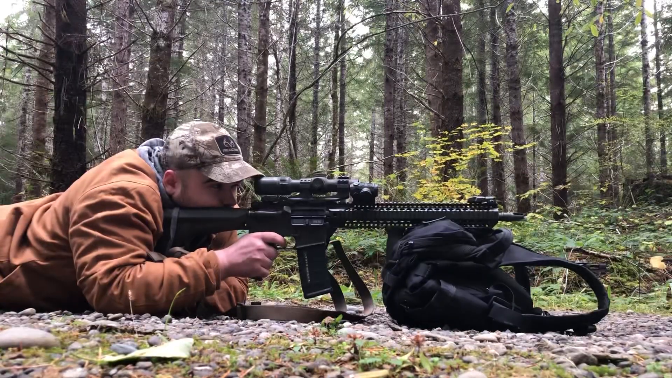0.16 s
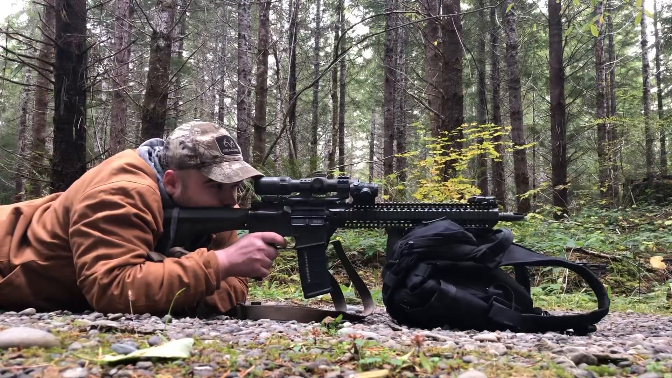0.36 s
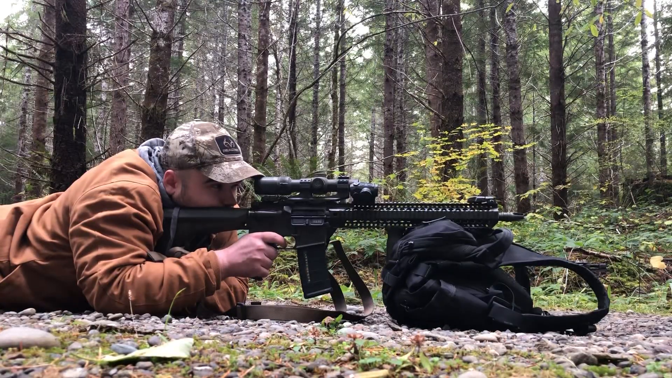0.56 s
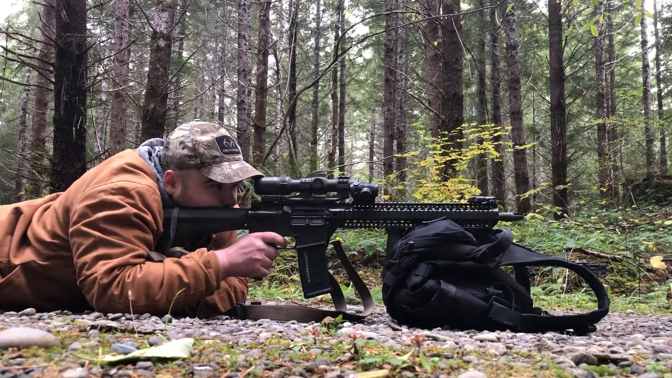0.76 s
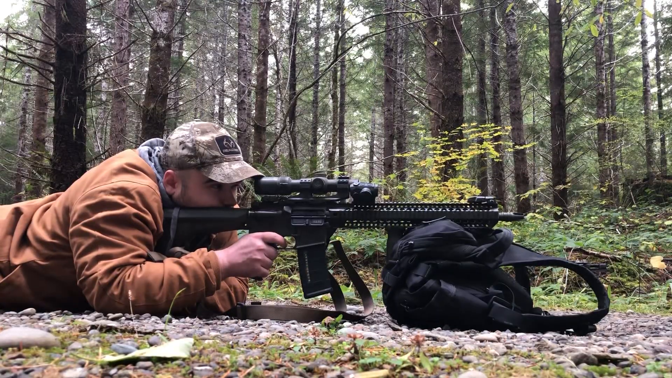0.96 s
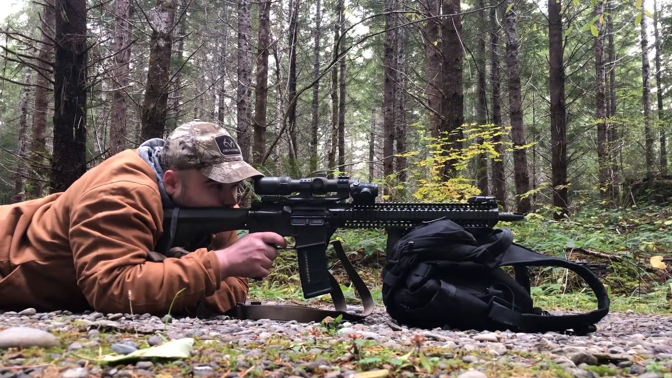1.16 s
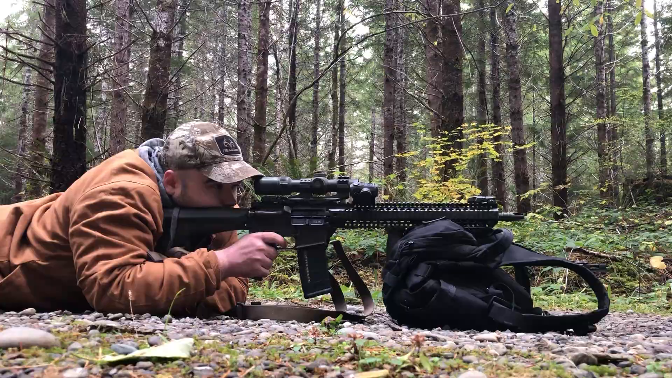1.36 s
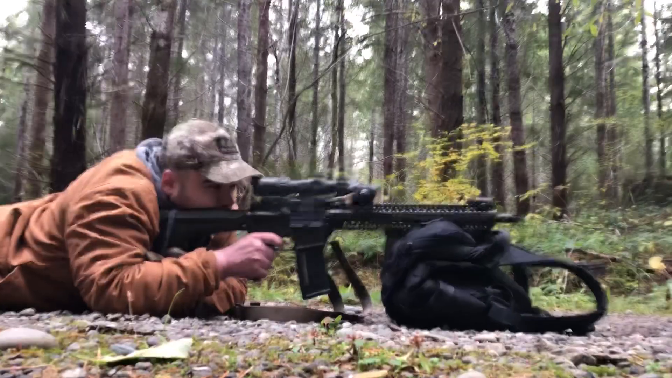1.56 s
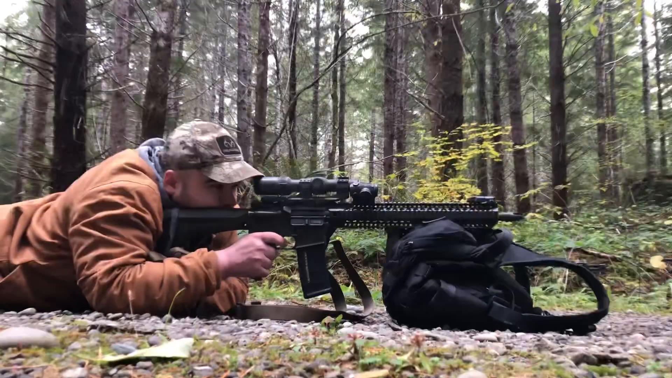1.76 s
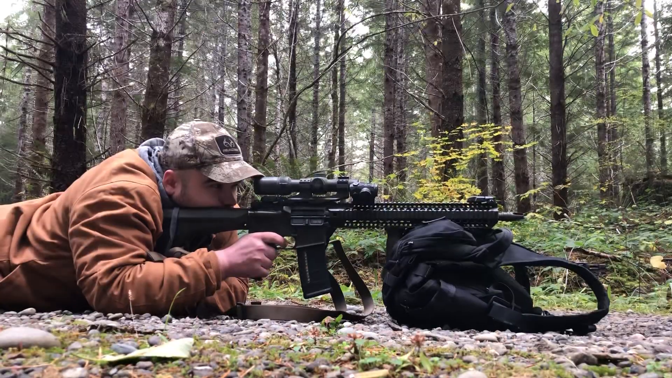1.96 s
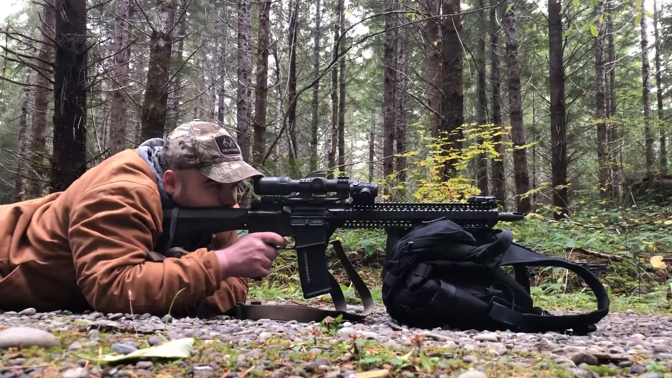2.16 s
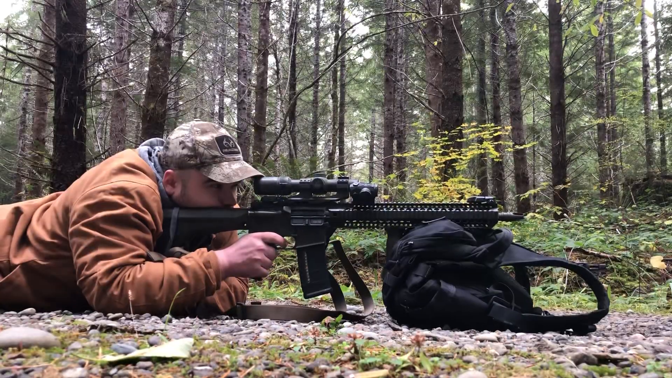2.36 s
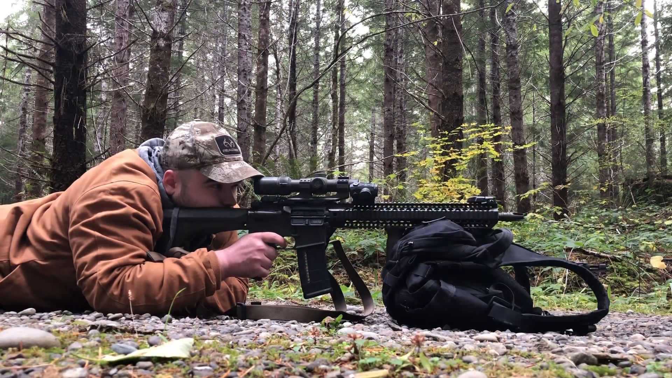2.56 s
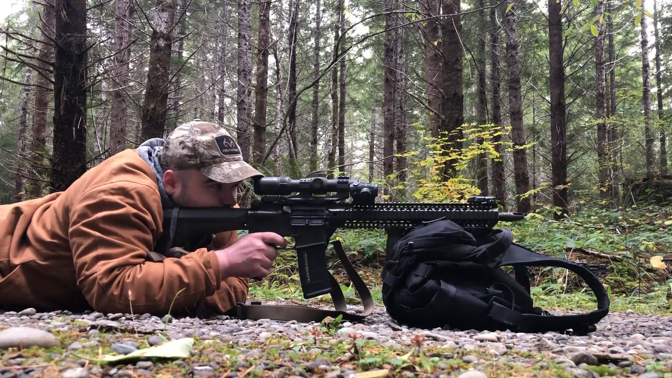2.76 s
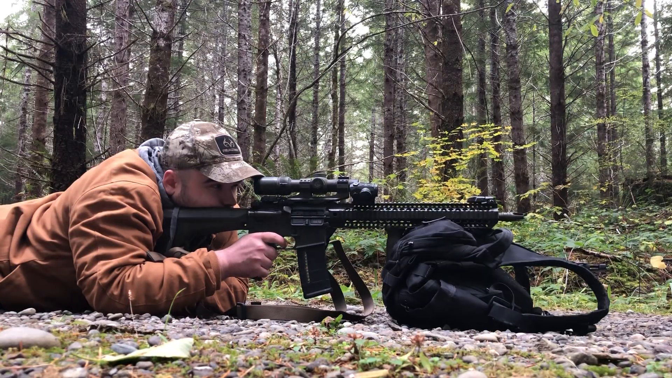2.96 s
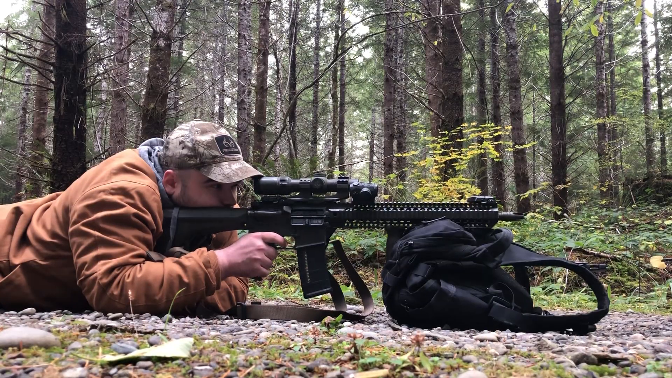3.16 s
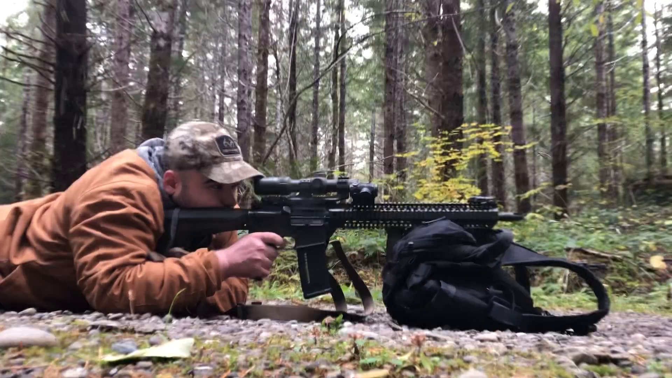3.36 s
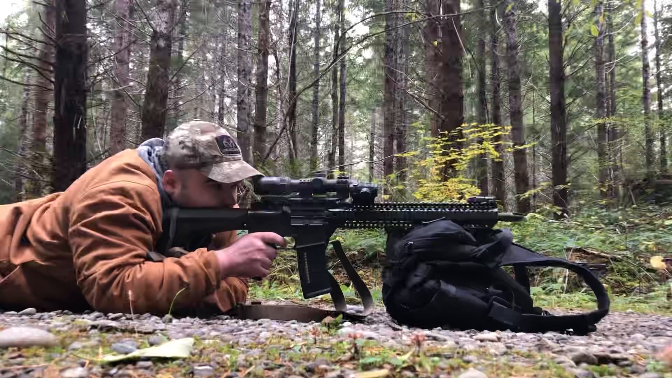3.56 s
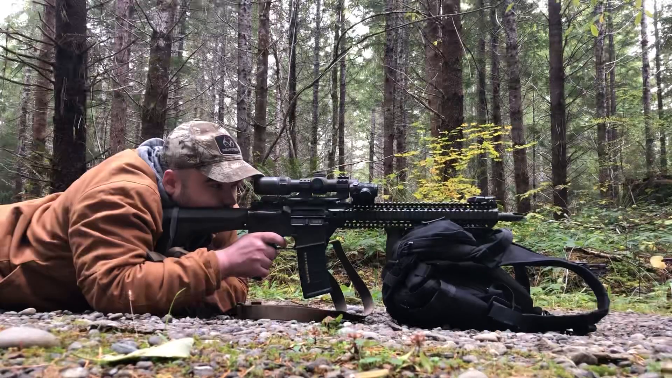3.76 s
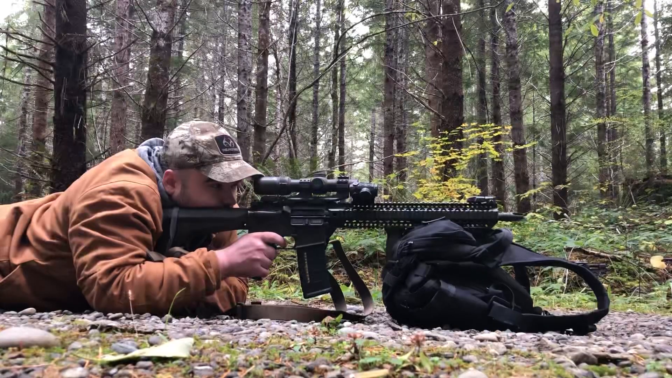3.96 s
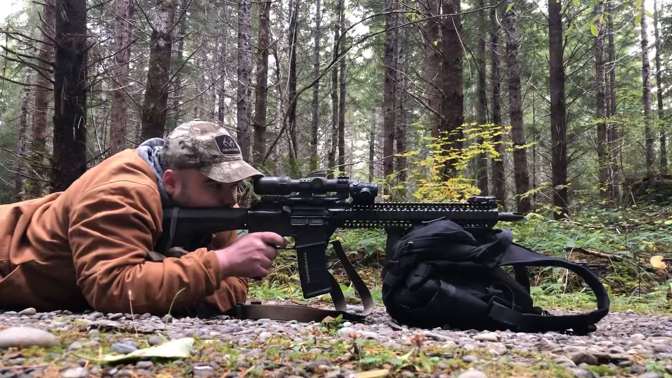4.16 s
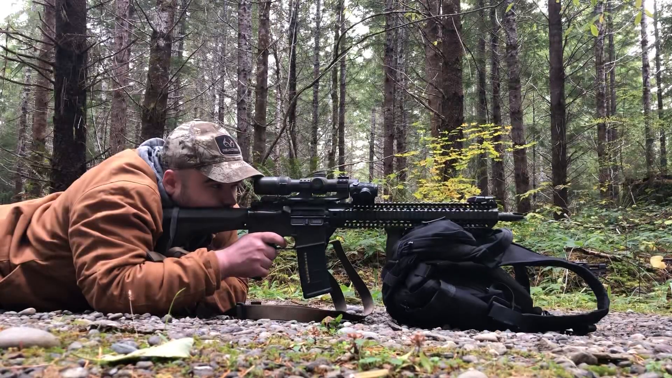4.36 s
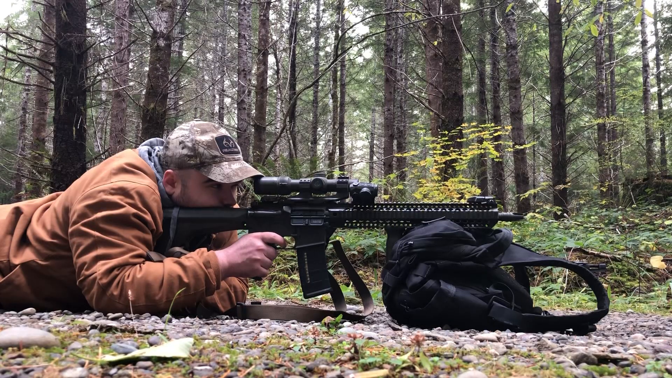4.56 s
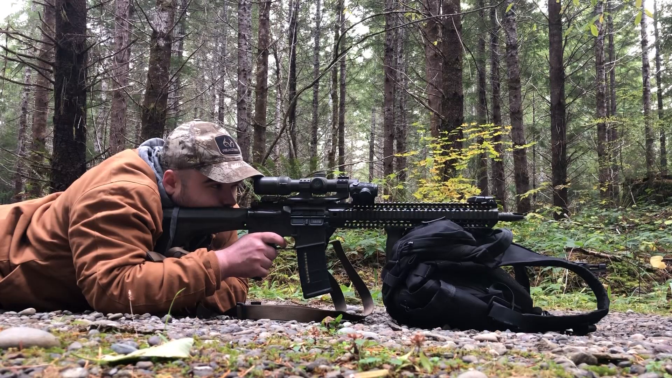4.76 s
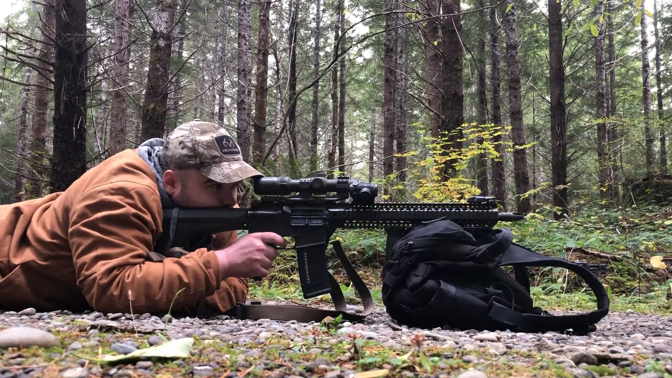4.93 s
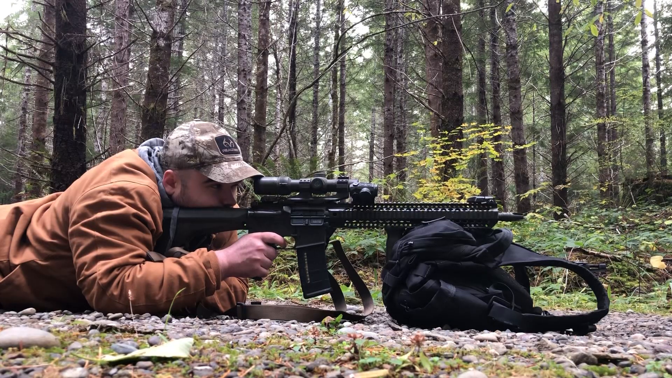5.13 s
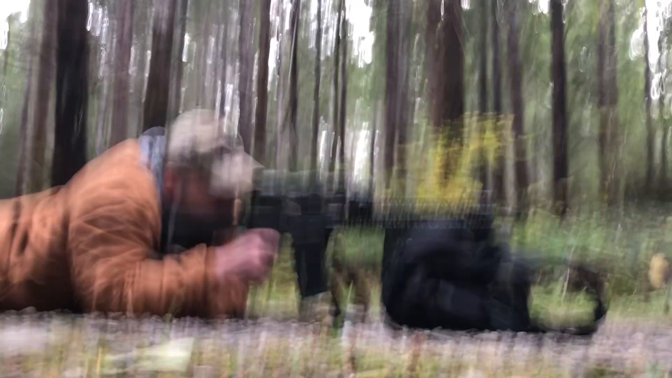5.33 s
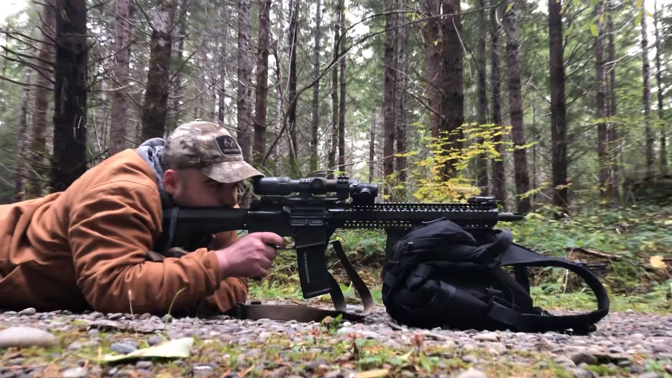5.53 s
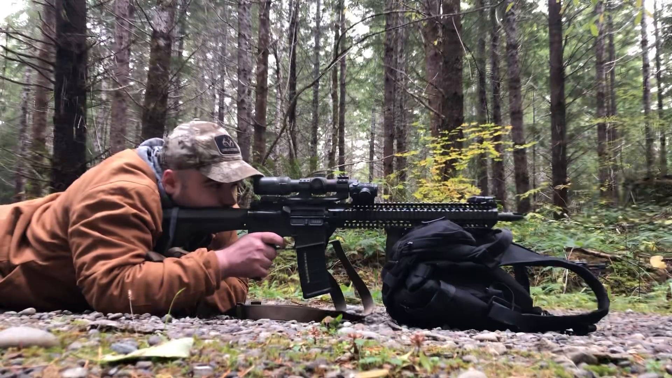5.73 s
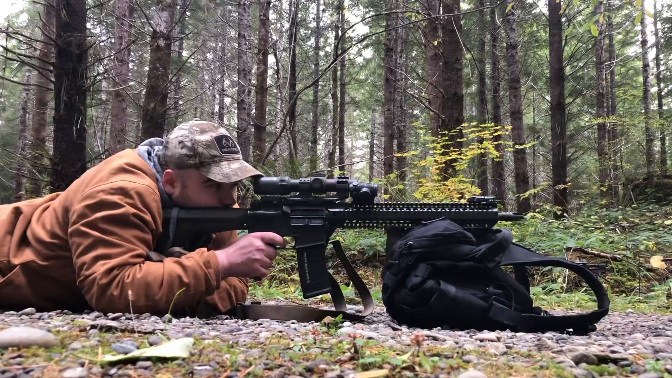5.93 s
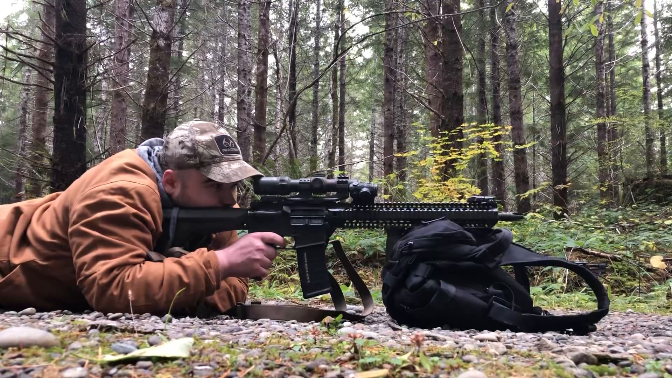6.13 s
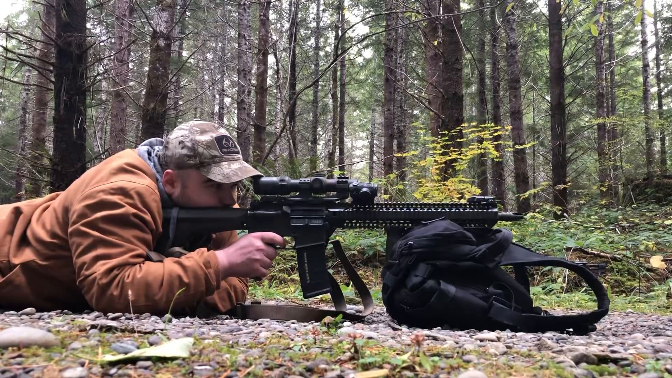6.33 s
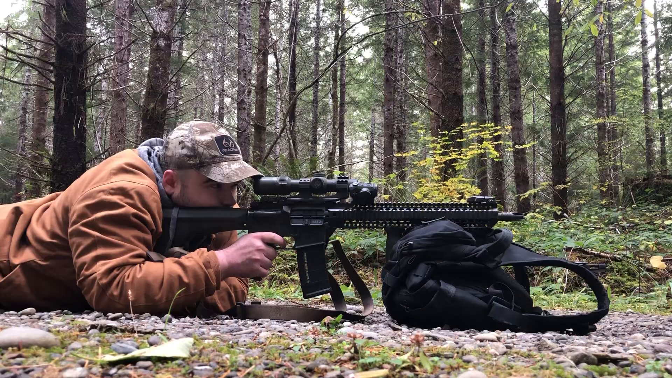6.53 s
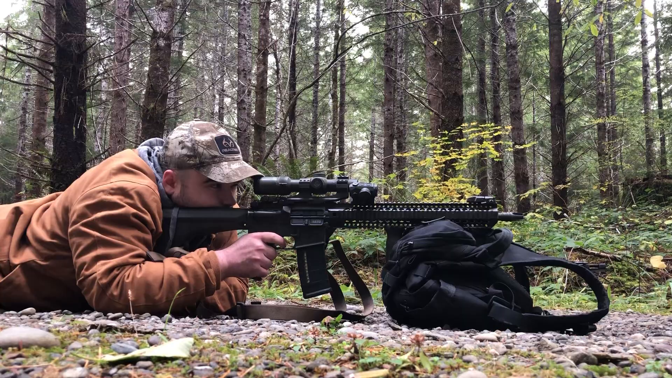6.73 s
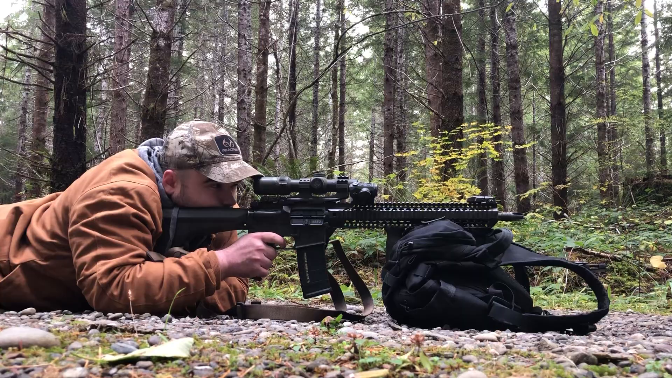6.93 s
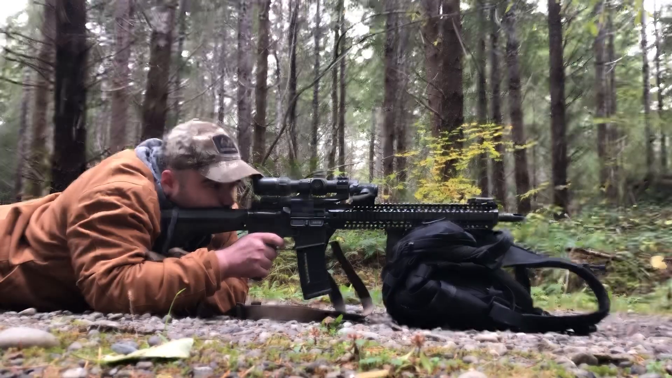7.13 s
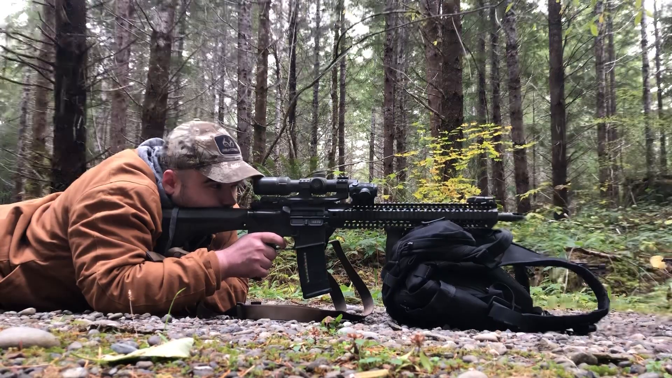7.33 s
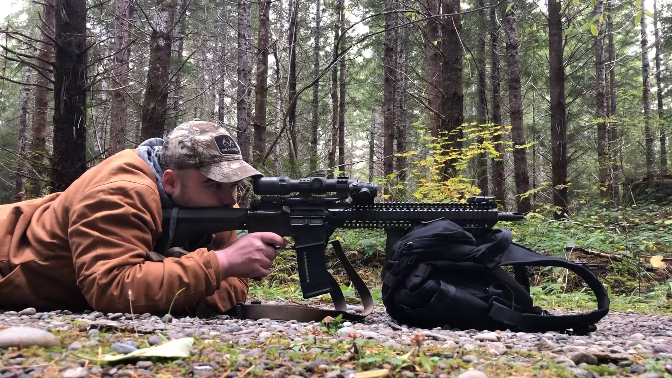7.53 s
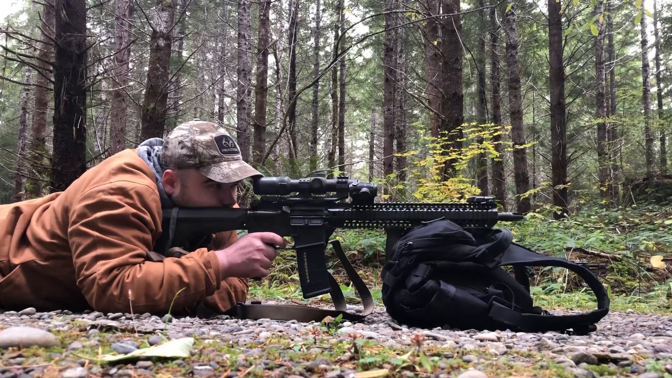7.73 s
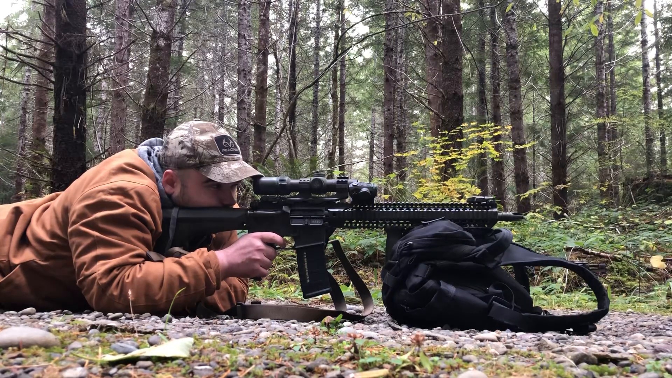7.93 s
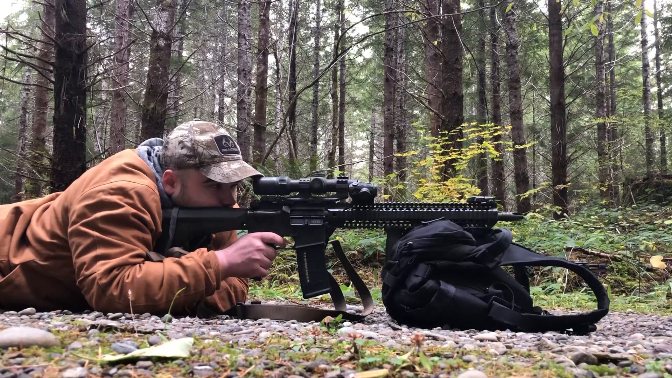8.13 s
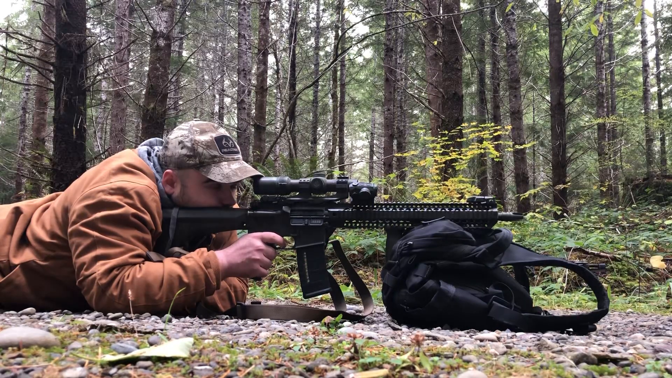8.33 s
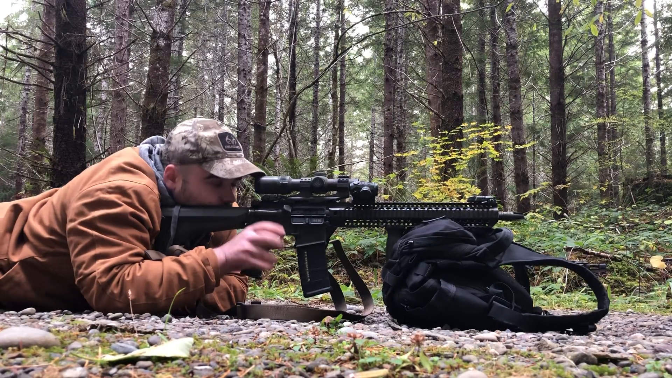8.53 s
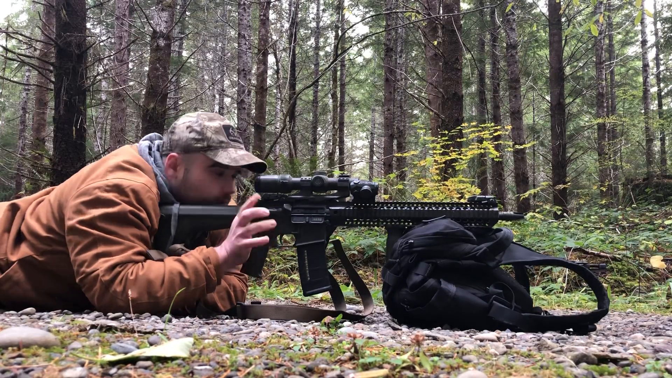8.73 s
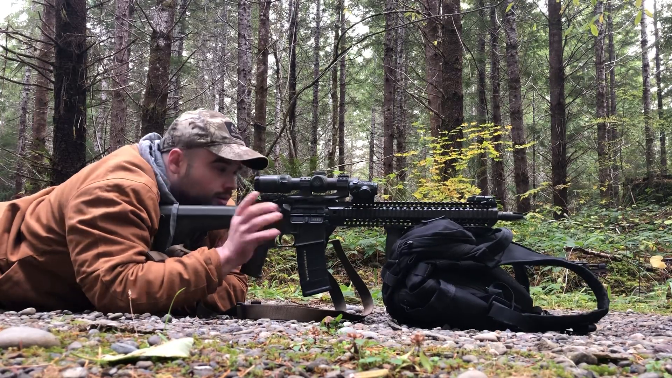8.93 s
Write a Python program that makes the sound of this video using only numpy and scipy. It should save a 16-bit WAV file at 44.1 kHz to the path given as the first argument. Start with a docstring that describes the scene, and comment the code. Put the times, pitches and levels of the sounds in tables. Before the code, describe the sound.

A rifle fires four single shots outdoors with long rolling echoes, small casing clinks and far-off hits on steel, then a click.

```python
"""Slow, close rifle shots in a hushed conifer forest. We open on the tail of a shot rolling away, and a
far steel target answers. Four more follow, one cued by a faint trigger click. Each time the action
rattles, the blast slaps back off ground and trunks and the bolt slams shut; as the echo rolls off through
the wood, the brass case tinkles on gravel, and a second after the bang the target answers again.
At the end the safety clicks on."""
import sys
import numpy as np
from scipy import signal
from scipy.fft import rfft, irfft, next_fast_len
from scipy.io import wavfile
from scipy.ndimage import uniform_filter1d

SR = 44100
rng = np.random.default_rng(int(sys.argv[2]) if len(sys.argv) > 2 else 0)


def dump(signal):
    """Clip the signal to [-1, 1] and save it as 16-bit WAV at the path in sys.argv[1]."""
    limited = np.clip(np.atleast_2d(signal).T, -1, 1)
    pcm = np.round(limited * 32767).astype(np.int16)
    wavfile.write(sys.argv[1], SR, pcm)


N = 396455
TAIL_SAMPLES = 2 ** 17

# EQ of the forest bed, the lever snap and the target's far echo: freq_hz, gain_db
HUSH_EQ = [(25, -49), (60, -36), (100, -21), (160, -5), (260, 0), (400, 0), (560, -5), (780, -11),
           (1050, -10), (1500, -15), (2300, -21), (3200, -41), (5000, -61), (15000, -64)]
LEVER_EQ = [(30, -48), (200, -20), (550, -5), (1000, -8), (1550, -1), (2300, -13), (3200, -6), (5000, -11),
            (7500, -16), (10000, -10), (12500, 0), (15000, -4), (16000, -18)]
FAR_ECHO_EQ = [(30, -45), (150, -18), (400, -3), (1000, 0), (2500, -3), (4000, -12), (6500, -25),
               (8500, -40), (12000, -60)]
# cues for the trigger, then the safety: start_s, level_db
LEVER_CUES = [(3.1525, -50), (8.8558, -20.5)]
# bullets at the target, each spot favouring one pitch: start_s, crack_db, ring_db, favoured_hz
HIT_CUES = [(.3915, -29, -53, 6200), (2.5695, -33, -63, 6400), (4.2788, -32, -56, 4900),
            (6.3843, -31, -55, 5000), (8.0757, -29, -53, 4900)]
# modes of the steel plate and of a brass case (retuned for each case): pitch_hz, level_db, t60_s
STEEL_MODES = [(3380, -2, .55), (4945, -7, .4), (5262, 0, .3), (5696, -8, .6), (6056, -9, .28),
               (6627, 0, .2), (7436, -15, .18), (7637, -12, .18)]
BRASS_MODES = [(10710, -15, .26), (10760, -15, .26), (14730, -17, .18), (15090, -7, .22), (15130, 0, .14)]
# falling cases: start_s, hop_s, landing_db, rebound_db, tick_db, other_end_s, last_loss_db, pitch_hz
CASE_CUES = [(1.8215, .171, -47, -47, -60, .076, 7, 10950), (3.573, .14, -41, -46, -46, .036, 16, 10790),
             (5.6795, .2343, -24, -44, -38, .079, 4, 10710), (7.337, .1075, -43, -53, -60, .153, 10, 10860)]
# EQ of the muzzle blast, its scatter in the clearing and its echo from the wood: freq_hz, gain_db
BLAST_EQ = [(25, -26), (90, -4), (400, -1), (550, -2), (700, -6), (900, 0), (1250, -4), (1700, 1),
            (2700, -4), (4000, -5), (6200, -8), (7500, -11), (11000, -11.5), (15500, -15.5)]
CLEARING_EQ = [(25, -24), (70, -4), (150, -2), (260, -4), (450, -4), (650, -4), (1000, -3), (1800, -3),
               (2400, -11), (4000, -13), (6300, -12), (10000, -18), (15500, -23)]
WOOD_EQ = [(25, -32), (70, -18), (130, -9), (200, -4), (350, -2), (600, -4), (800, -7), (1100, -8),
           (1700, -8), (2800, -13), (4500, -10), (6500, -15), (10000, -21), (15500, -29)]
# what the air absorbs: freq_hz, loss_db_per_s
AIR_LOSS = [(50, 15), (150, 10), (400, 1.5), (1000, .5), (2500, 2), (4500, 16), (7000, 31), (10000, 58),
            (15000, 105)]
# two near slaps, off the ground and then the nearest trunk: delay_s, level_db, pitch_hz
NEAR_SLAPS = [(.0128, -9, 420), (.0321, -6.5, 330)]
# resonances of the rifle as it fires and as the bolt closes: centre_hz, width_hz, level_db
ACTION_BANDS = [(290, 220, -3.5), (1780, 170, 0), (2200, 220, -3), (3000, 130, -8)]
BOLT_BANDS = [(600, 150, -6), (6300, 500, -2), (9300, 900, -3), (12000, 2000, 0)]
# shots, the first already rolling away as we open: start_s, bolt_delay_s, bolt_db
SHOT_CUES = [(-.68, .074, -22), (1.4972, .0705, -21), (3.216, .0745, -20), (5.3253, .074, -20.5),
             (7.0124, .072, -20)]


def amp(db):
    return 10 ** (np.asarray(db) / 20)


def unit_rms(x):
    return x / np.sqrt(np.mean(x ** 2) + 1e-20)


def curve_at(points, hz):
    freq_hz, value = np.transpose(points)
    return np.interp(np.log(hz + 1), np.log(freq_hz), value)


def add(mix, start_s, sound):
    start = round(start_s * SR)
    sound = sound[max(-start, 0):]
    part = mix[max(start, 0):][:len(sound)]
    part += sound[:len(part)]


def clock(size):
    return np.arange(size) / SR


def fade(t, t60, hold_s=0):
    """Holds full level, then falls 60 dB every t60 seconds."""
    return np.exp(-np.log(1000) * np.maximum(t - hold_s, 0) / t60)


def colour(x, eq):
    """Runs x through an EQ curve, at rms 1."""
    size = next_fast_len(len(x), True)
    gain = amp(curve_at(eq, np.fft.rfftfreq(size, 1 / SR)))
    return unit_rms(irfft(rfft(x, size) * gain, size)[:len(x)])


def burst(eq, envelope):
    """Enveloped noise through a minimum-phase EQ, so even the attack carries the colour."""
    hz = abs(np.fft.fftfreq(len(envelope), 1 / SR))
    log_gain = np.log(unit_rms(amp(curve_at(eq, hz))))
    causal = np.exp(np.conj(signal.hilbert(log_gain)))
    return np.fft.ifft(np.fft.fft(rng.standard_normal(len(envelope)) * envelope) * causal).real


def rattle(bands, size):
    """Noise in a few resonances, at rms 1."""
    hz = np.fft.rfftfreq(size, 1 / SR)
    gain = sum(amp(db) / np.sqrt(width) / (1 + (2 * (hz - f) / width) ** 2) for f, width, db in bands)
    return unit_rms(irfft(rfft(rng.standard_normal(size)) * gain, size))


def ring(modes, t):
    """Dying sines of struck metal."""
    return sum(amp(db) * fade(t, t60) * np.sin(2 * np.pi * (hz * t + rng.random()))
               for hz, db, t60 in modes)


def forest_hush(level_db=-50.5, waver_db=.5):
    """The bed: a low, steady rush of distant forest."""
    waver = unit_rms(uniform_filter1d(rng.standard_normal(N), size=6000))
    return amp(level_db) * colour(rng.standard_normal(N), HUSH_EQ) * amp(waver_db * waver)


def steel_target(top_hz=3300, low_hz=560, sweep_s=.0011, spot_hz=800, strike_delay_s=.013):
    """Far downrange: the bullet's crack, smeared into a falling chirp, then the plate and its echo."""
    out, t = np.zeros(N), clock(size=32768)
    cycles = np.cumsum(low_hz + (top_hz - low_hz) * np.exp(-t / sweep_s)) / SR
    chirp = np.sin(2 * np.pi * cycles) * np.exp(-((t - .0028) / .0021) ** 2) * np.minimum(t / .0008, 1)
    for start_s, crack_db, ring_db, favoured_hz in HIT_CUES:
        snap = burst([(30, -40), (600, 0), (1900, -3), (2900, 3), (4500, -15), (8500, -26),
                      (12000, -48)], fade(t, t60=.014))
        add(out, start_s, amp(crack_db) * (chirp + amp(-5) * snap))
        modes = [(hz, db - 12 * np.tanh(abs(hz - favoured_hz) / spot_hz) ** 2, t60)
                 for hz, db, t60 in STEEL_MODES]
        splash = burst([(30, -35), (500, 0), (2000, -3), (4500, -2), (6500, -6), (8500, -25),
                        (12000, -48)], fade(t, t60=.03))
        echo = burst(FAR_ECHO_EQ, fade(t, t60=.6))
        strike = amp(ring_db) * ring(modes, t) + amp(crack_db - 13) * splash + amp(crack_db - 20) * echo
        add(out, start_s + strike_delay_s, strike)
    return out


def levers():
    """Trigger and safety snap over their catches; nearby brush returns a faint, duller tail."""
    out, t = np.zeros(N), clock(size=16384)
    for start_s, level_db in LEVER_CUES:
        snap = burst(LEVER_EQ, fade(t, t60=.01))
        decay = fade(t, t60=.05) + amp(-15) * fade(t, t60=.34)
        tail = burst([(30, -35), (500, 0), (1600, 0), (3500, -9), (15000, -14)], decay)
        add(out, start_s, amp(level_db) * (snap + amp(-21) * tail))
    return out


def bounces(hop_s, landing_db, rebound_db, tick_db, other_end_s, last_loss_db, hop_ratio=.748):
    """A case lands and bounces twice; its other end taps sometime after the first rebound."""
    return [(0, landing_db, tick_db),  # delay_s, ring_db, tick_db
            (hop_s, rebound_db, tick_db),
            (hop_s + other_end_s, rebound_db - 7, tick_db - 14),
            (hop_s * (1 + hop_ratio), rebound_db - last_loss_db, tick_db - last_loss_db)]


def brass_cases():
    """Spent brass ticks on stone and rings in close, beating modes; tumbling flutters the ring."""
    out, t = np.zeros(N), clock(size=16384)
    for start_s, *fall, pitch_hz in CASE_CUES:
        for delay_s, ring_db, tick_db in bounces(*fall):
            tick = burst([(200, -30), (2000, -5), (5000, 0), (8500, 0), (15000, -3)], fade(t, t60=.007))
            tumble = 1 + .35 * np.cos(2 * np.pi * rng.uniform(40, 65) * t)
            tinkle = ring(BRASS_MODES, t * pitch_hz / BRASS_MODES[0][0])  # lowest mode at pitch_hz
            add(out, start_s + delay_s, amp(ring_db) * tumble * tinkle + amp(tick_db) * tick)
    return out


def stirred_air(paths, steady_hz):
    """The trees stand still, so echoes repeat from shot to shot; moving air reshuffles the treble."""
    kept = 1 / (1 + (np.fft.rfftfreq(TAIL_SAMPLES, 1 / SR) / steady_hz) ** 2)
    fresh = rfft(rng.standard_normal(TAIL_SAMPLES))
    return irfft(kept * rfft(paths) + np.sqrt(1 - kept ** 2) * fresh, TAIL_SAMPLES)


def wood_echo(paths, t, swell_s=.122, rise=4.2, spread=3.58):
    """The tail swells as the blast reaches the trees, then thins with distance as the air dulls it."""
    hz, frame_s, spectra = signal.stft(colour(paths, WOOD_EQ), SR, nperseg=512)
    loss_db = curve_at(AIR_LOSS, hz)[:, None] * np.maximum(frame_s - swell_s, 0)
    echo = signal.istft(spectra * amp(-loss_db), SR, nperseg=512)[1][:TAIL_SAMPLES]
    reach = (t + 1 / SR) / swell_s
    return amp(-19) * echo / (reach ** (-2 * rise) + reach ** (2 * spread)) ** .25


def slap(t, delay_s, level_db, pitch_hz, width_rad):
    """A single reflection: one rounded swing of pressure."""
    phase = 2 * np.pi * pitch_hz * (t - delay_s)
    return amp(level_db) * np.sin(phase) * np.exp(-(phase / width_rad) ** 2)


def early_echoes(t, count=10, stand_delay_s=.046, stand_depth_s=.02, thick_hz=250, thin_hz=1900):
    """Slaps off the ground, the nearest trunk, then a stand whose thin trunks answer higher and weaker."""
    out = sum(slap(t, *near, width_rad=3.3) for near in NEAR_SLAPS)
    for depth, thinness in zip(rng.random(count), np.linspace(0, 1, count) ** 1.5):
        pitch_hz = thick_hz * (thin_hz / thick_hz) ** thinness
        out += slap(t, stand_delay_s + stand_depth_s * depth, -17 - thinness, pitch_hz, width_rad=5.5)
    return out


def muzzle_blast(paths, clumps, t):
    """A short, dense roar from the muzzle, then scatter off the ground and brush of the clearing."""
    near, brush = paths[:2 * len(t)].reshape(2, -1)
    envelope = np.minimum(t / .0006, 1) * fade(t, t60=.2) * fade(t, t60=.027, hold_s=.013)
    roar = colour(near, BLAST_EQ) * envelope
    scatter = colour(brush * clumps[:len(t)], CLEARING_EQ) * np.minimum(t / .014, 1) * fade(t, t60=.42)
    return amp(-8.3) * roar + amp(-17.3) * scatter


def rifle(clump_db=2.2):
    """The hero sound: action and hammer, blast and echoes, a singing spring, the bolt going home."""
    out, t = np.zeros(N), clock(TAIL_SAMPLES)
    body_t, short_t = clock(SR // 2), clock(size=4096)
    density = unit_rms(uniform_filter1d(rng.standard_normal(TAIL_SAMPLES), size=90))
    clumps = amp(clump_db * density)  # trunks stand in clumps, so the echoes come in patches
    still_paths = rng.standard_normal(TAIL_SAMPLES)
    slapback = early_echoes(body_t)
    swell = np.minimum(short_t / .006, 1) * fade(short_t, t60=.03, hold_s=.014)
    slam = np.minimum(short_t / .001, 1) * fade(short_t, t60=.022, hold_s=.002)
    for start_s, bolt_delay_s, bolt_db in SHOT_CUES:
        fizz = burst(BLAST_EQ, short_t < .023)  # a faint lead-in to the bang
        add(out, start_s - .0228, amp(-34) * fizz)
        add(out, start_s - .011, amp(-18) * rattle(ACTION_BANDS, len(short_t)) * swell)
        hammer = rattle([(10000, 1800, 0), (14000, 2500, -2)], len(short_t)) * fade(short_t, t60=.018)
        add(out, start_s - .0074, amp(-20) * hammer)
        paths = stirred_air(still_paths, steady_hz=5000)
        add(out, start_s, muzzle_blast(paths, clumps, body_t) + slapback)
        add(out, start_s, wood_echo(paths[::-1] * clumps, t))
        spring = rattle([(8569, 22, 0)], len(body_t)) * fade(body_t, t60=.55)
        add(out, start_s, amp(-35.5) * spring)
        add(out, start_s + bolt_delay_s, amp(bolt_db) * rattle(BOLT_BANDS, len(short_t)) * slam)
    return out


def scene():
    """The mono mix: rifle up front, small metal details and the far target over the forest bed."""
    return (rifle() + brass_cases() + steel_target() + levers() + forest_hush())[None]


def record(dry, ceiling=.9, cutoff_hz=16000):
    """Soft-clips the loudest peaks, then trims the extreme top."""
    rounded = dry / (1 + (dry / ceiling) ** 6) ** (1 / 6)
    lowpass = signal.firwin(511, cutoff_hz, window=("kaiser", 9), fs=SR)
    return signal.oaconvolve(rounded, lowpass[None], "same")


dry = scene()
out = record(dry)
dump(out)
```